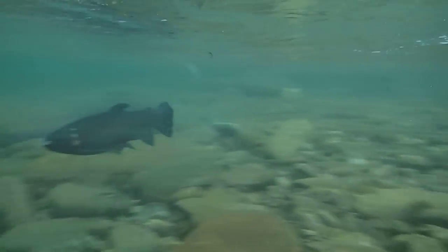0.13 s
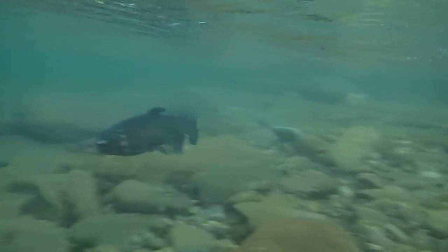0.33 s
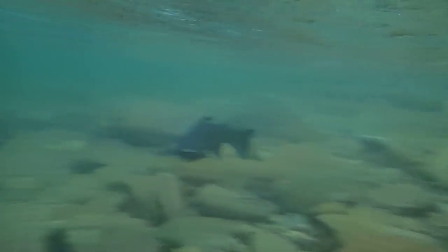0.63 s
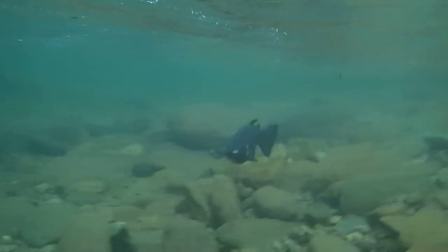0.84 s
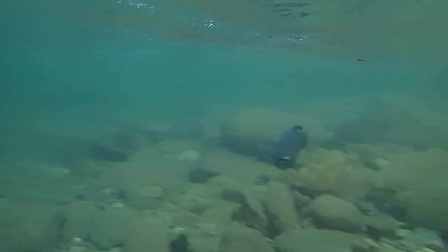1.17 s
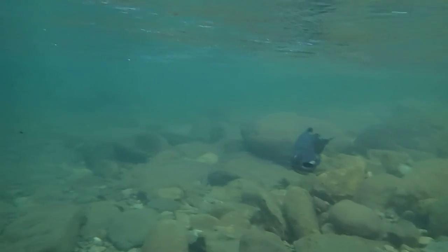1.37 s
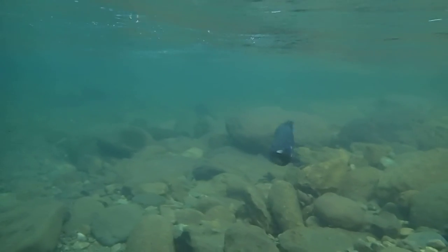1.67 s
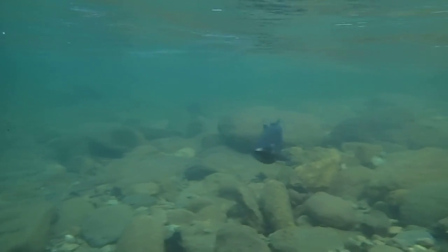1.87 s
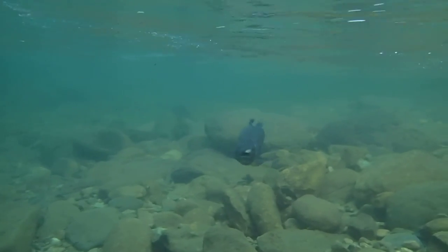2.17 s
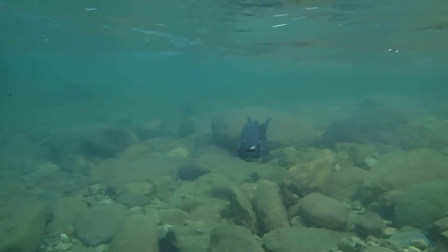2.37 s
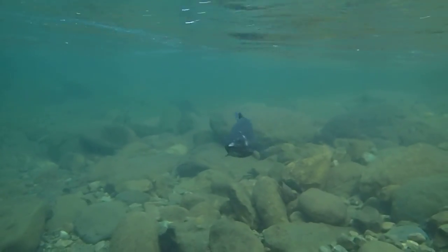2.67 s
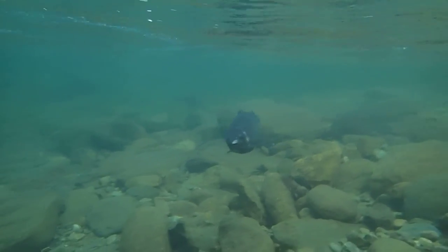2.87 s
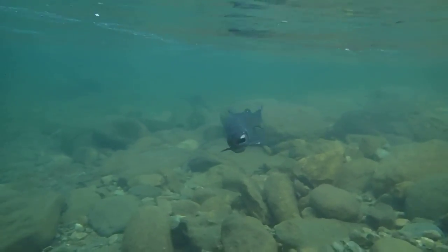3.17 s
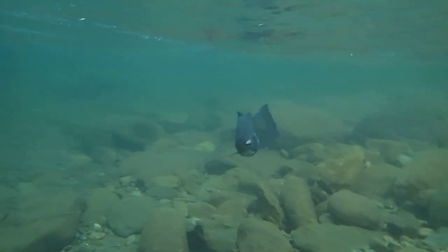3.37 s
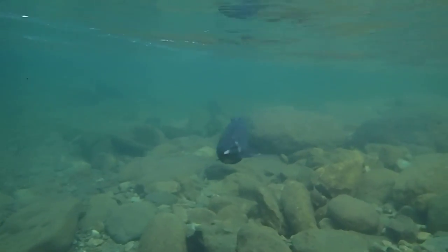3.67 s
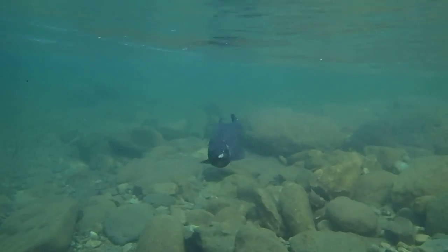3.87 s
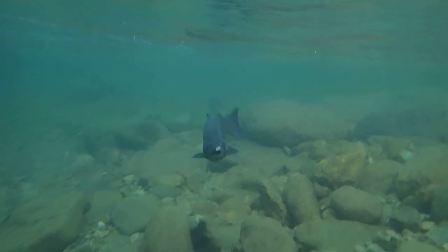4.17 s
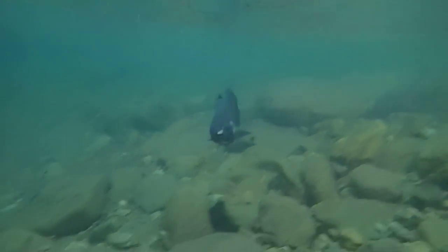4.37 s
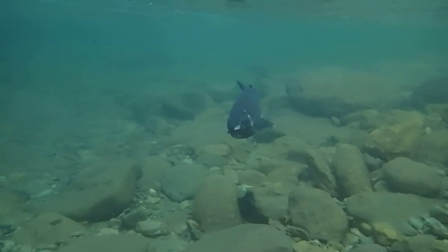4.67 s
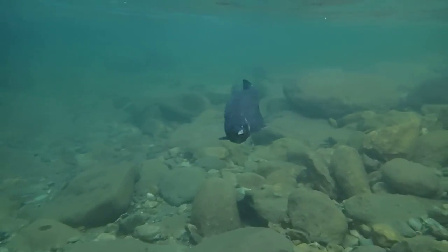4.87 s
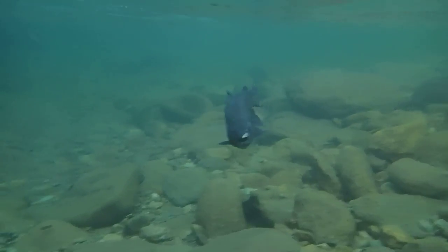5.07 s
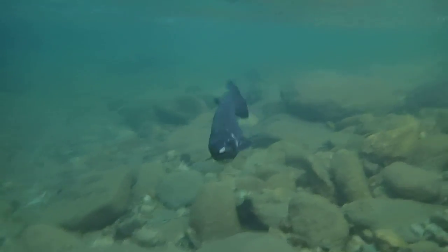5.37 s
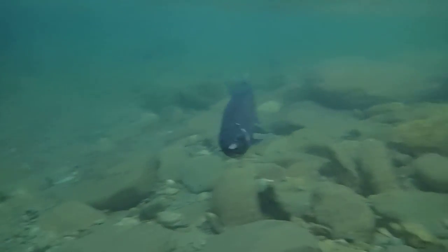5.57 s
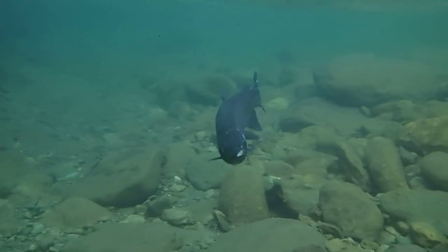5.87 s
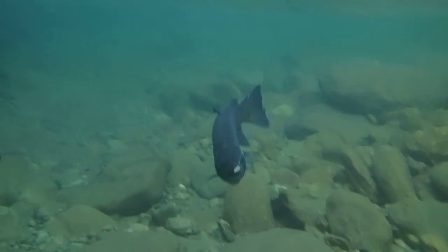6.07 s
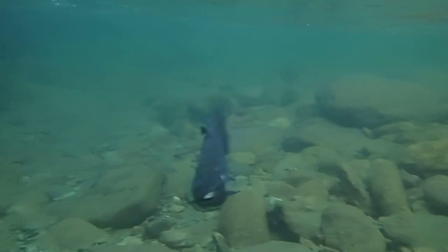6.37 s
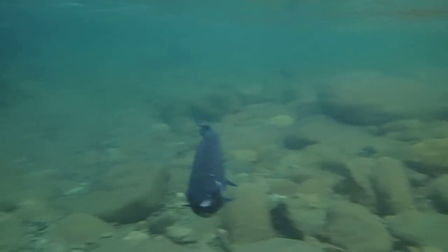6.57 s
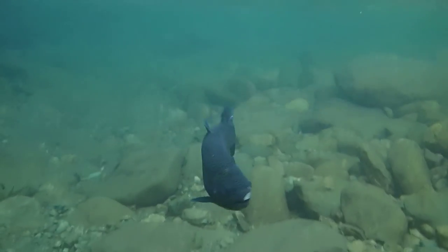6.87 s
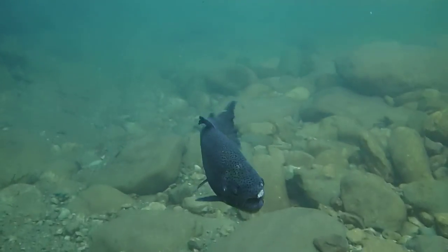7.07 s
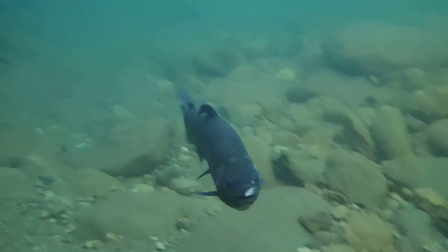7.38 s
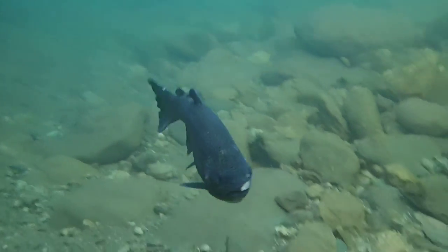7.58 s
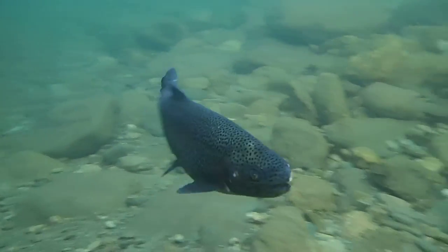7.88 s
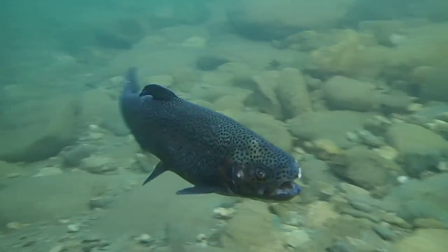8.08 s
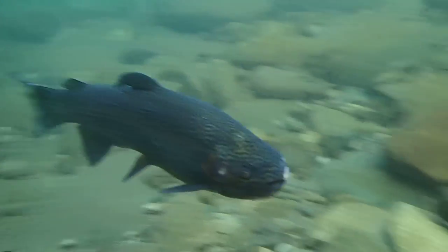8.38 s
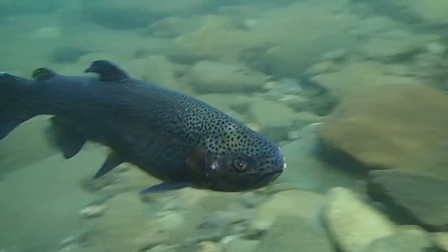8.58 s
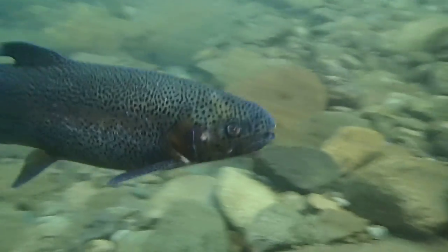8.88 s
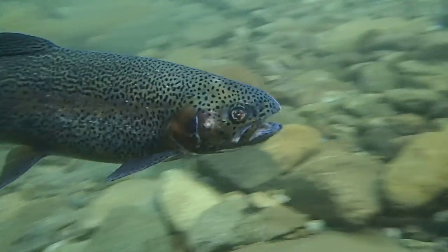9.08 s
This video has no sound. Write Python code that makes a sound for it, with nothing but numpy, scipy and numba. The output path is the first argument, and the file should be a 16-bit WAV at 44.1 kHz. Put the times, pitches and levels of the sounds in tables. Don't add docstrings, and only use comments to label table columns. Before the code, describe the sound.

A small camera under water in a shallow stony river hears a hollow, gurgling rush, ringing in low-mid tones and surging unevenly. A fast, regular focus-motor tick runs throughout. Water slaps the left side in scattered knocks; low gulps touch the right. The right-hand tone climbs until a water film bursts in a loud, distorted crack with a short flapping buzz; the sound ducks briefly, then the rush returns.

```python
import sys
import numpy as np
from scipy import signal
from scipy.io import wavfile
from scipy.ndimage import uniform_filter1d
from numba import njit

SR = 44100
rng = np.random.default_rng(int(sys.argv[2]) if len(sys.argv) > 2 else 0)


def invert_db(x):
    u = np.asarray(x, float) / 20
    return 10 ** u


def generate_wav(sig):
    pcm = np.round(np.clip(np.atleast_2d(sig).T, -1, 1) * 32767).astype(np.int16)
    wavfile.write(sys.argv[1], SR, pcm)


N = 406602

# push_hz, push_db
LEFT_PUSH = [(20, -28), (45, -30), (100, 4.5), (200, -2.5), (330, 3), (600, 6.5), (800, 1), (1100, 4.5),
             (1250, 0), (2200, 5.5), (3500, -11), (6000, -21)]
RIGHT_PUSH = [(20, -31), (45, -37), (70, -17.5), (120, -12.5), (220, -8), (400, -2), (770, -0.5),
              (1100, -1.5), (1600, -5), (2500, -3), (3350, -8), (3650, -23), (6000, -19)]
# push_hz, likeness_0_to_1
PUSH_LIKENESS = [(40, 0.64), (100, 0.9), (170, 0.57), (400, 0.68), (700, 0.83), (1100, 0.87), (2000, 0.24)]
# mode_hz, width_hz, gain_db
CASE_MODES = [(327, 10, -5), (830, 81, 5), (1106, 32, -1)]
# centre_s, half_width_s, left_db, right_db
SURGES = [(0.2, 0.27, 1.5, 3), (0.62, 0.14, 3.5, -1), (1.3, 0.45, 1.5, 0), (3.6, .25, 0.5, 0),
          (5.25, 0.15, 4.5, 0), (5.5, 0.45, 0, 3), (6.1, 0.1, -3.5, 0.5), (6.6, 0.35, 0.5, -1.1),
          (8.0, 0.17, -1.2, -1), (8.335, .035, 5, 2), (8.8, 0.089, -0.5, -2), (9.06, 0.1, 3.5, 0.5)]
# time_s, resonance_hz
LEFT_POCKET = [(0.03, 420), (0.55, 349), (0.9, 380), (1.3, 332), (2.8, 342), (3.4, 316), (3.9, 270),
               (4.15, 325), (4.7, 339), (5.4, 317), (5.85, 376), (6.5, 354), (7.1, 385), (8, 424),
               (8.6, 460), (9.2, 468)]
LEFT_DB = -32.5
LEFT_Q, RIGHT_Q_BEFORE, RIGHT_Q_AFTER = 6.5, 11.0, 7.0
# tear_s, slack_hz, creep_hz_per_s, stretch_hz, stretch_time_s
FILMS = [
    (6.1373, 730, 12.9, 132, 0.48),
    (9.225, 564.4, 2.44, 110, 0.29),
]
# pitch_share, time_s, level_db
SNAPS = [
    (0.45, 0.02, 3),
    (0.95, 0.045, -1),
]
FILM_DB = (-31.6, -28.7)
# centre_s, rise_hz, half_width_s
BULGES = [
    (6.0, 70, 0.05),
    (8.0, 40, 0.14),
    (8.7, 84.5, 0.32),
    (8.95, 152, 0.063),
]
BURST_S = 6.1384
# start_s, peak_db, push_ms
SLAPS = [(0.519, -21, 1.6), (0.538, -19, 1.45), (0.558, -32, 1.4), (0.579, -24, 3.1), (0.765, -16.5, 0.65),
         (0.938, -23, 2.1), (1.525, -33, 1.1), (1.703, -23, 2.7), (2.333, -27, 1.8), (3.845, -24.5, 2.1),
         (4.201, -19.5, 1.7), (4.374, -25.5, 1), (4.523, -25, 1.3), (4.618, -15, 0.72), (4.687, -11, 0.5),
         (5.077, -19, 1.6), (5.237, -9.5, 0.41), (5.666, -10.5, 0.64), (5.861, -20, 0.8), (6.752, -8, 0.45),
         (6.901, -24, 1), (7.081, -17.5, 0.77), (7.312, -21.5, 0.9), (8.143, -25, 0.8), (8.2, -13.5, 0.49),
         (8.308, -23, 0.94), (8.317, -20, 0.6), (8.329, -17, 0.9), (8.343, -25, 0.9), (8.354, -23, 0.9)]
# start_s, peak_db, pitch_hz
GULPS = [
    (0.308, -26, 88.8),
    (5.789, -38, 61.9),
    (5.829, -30, 73),
    (5.857, -41, 121),
    (6.287, -22, 79.4),
    (7.22, -37, 148),
    (8.329, -27, 187),
    (8.732, -32, 105),
    (9.053, -19, 96),
    (9.169, -35, 61.9),
]
# centre_s, level_db, length_s, pitch_hz
SPRAYS = [
    (8.345, -42, .04, 1550),
    (8.955, -41, .08, 1500),
    (9.213, -28, 0.03, 1650),
]
STEP_S, FIRST_STEP_S = 1001 / 30000, 0.02155
STEP_HZ, STEP_SIDES_DB, BACK_STEP_DB = 760, (-28, -25), -2.0
# delay_s, pitch_hz, length_s, level_db, return_step_db
WHINES = [(.027, 5550, .011, -59, -4), (.0235, 2850, .004, -53, 4.5), (.031, 3150, .004, -54, 4.0)]
TICK_S = 7.6975
# mode_hz, level_db, t60_s
TICK_MODES = [(5680, -19.5, 0.0047), (6080, -49, 0.033), (10400, -23, 0.0046), (2700, -29, 0.0024),
              (14000, -31, .003), (8200, -28, 0.0028), (12200, -26, .003)]
# mode_hz, width_hz, level_db
HUMS = [(326.2, 11.7, -38), (807, 17, -58.5), (1004, 20, -60), (1120, 14, -60), (5580, 680, -69)]
HUM_SIDES_DB, WET_HUM_DB = (-1.5, -9.5), 2.5
HUM_FADE_S, HUM_FADE_DB = 7.0, -10.0
# band_hz, level_db
HISS = [(200, 13), (2000, 4), (5000, 3.5), (8000, 2), (12000, 1), (16000, 1.5)]
HISS_SIDES_DB = (-55.5, -52.5)


def read(points, hz):
    f, value = np.transpose(points)
    return np.interp(np.log(hz + 1), np.log(f + 1), value)


def evened(x):
    return x / np.sqrt(np.mean(x ** 2, axis=-1, keepdims=True) + 1e-20)


def add(mix, s, sound):
    part = mix[round(s * SR):][:len(sound)]
    part += sound[:len(part)]


def bump(t, length_s):
    return np.sin(np.pi * np.clip(t / length_s, 0, 1)) ** 2


def swell(t, centre_s, half_s):
    return np.exp(-((t - centre_s) / half_s) ** 2)


def noise(shape_db, same, patchy_db):
    frames, hz = N // 256 + 5, np.fft.rfftfreq(1024, 1 / SR)
    a, b, c, d, patches = rng.standard_normal((frames, 513, 5)).T
    patches = uniform_filter1d(uniform_filter1d(patches, size=6, axis=0), size=8, axis=1)
    same = np.clip(same(hz), 0, 1)[:, None]
    left, other = a + 1j * b, c + 1j * d
    z = np.array([left, same * left + np.sqrt(1 - same ** 2) * other])
    z *= invert_db(shape_db(hz)[:, :, None] + patchy_db(hz)[:, None] * patches / patches.std())
    return evened(signal.istft(z, nperseg=1024, noverlap=768)[1][:, :N])


def current():
    def case_db(hz):
        return sum(db / (1 + (2 * (hz - f) / width) ** 2) for f, width, db in CASE_MODES)

    def shape_db(hz):
        return np.array([read(LEFT_PUSH, hz) + case_db(hz), read(RIGHT_PUSH, hz)])

    def patchy_db(hz):
        return read([(60, 4.7), (200, 1.2), (500, 0.8)], hz)

    flow = noise(shape_db, lambda hz: read(PUSH_LIKENESS, hz), patchy_db)
    bass = signal.lfilter(*signal.butter(1, 140, fs=SR), flow)
    return flow - 0.91 * (np.arange(N) / SR > BURST_S) * bass


@njit
def spring(push, turn, loss):
    out, place, speed = np.zeros(len(push)), 0., 0.
    for i in range(len(push)):
        speed += turn[i] * (turn[i] * (push[i] - place) - loss[i] * speed)
        place += speed
        out[i] = place
    return out


def film(t):
    k = (t >= BURST_S).astype(int)
    tear_s, slack_hz, creep, stretch_hz, stretch_s = np.transpose(FILMS)[:, k]
    share, quick_s, snap_db = np.transpose(SNAPS)[:, k]
    left_s = np.maximum(tear_s - t, 0)
    hz = slack_hz + creep * t + stretch_hz * np.exp(-left_s / stretch_s)
    hz = hz + sum(rise_hz * swell(t, s, half_s) for s, rise_hz, half_s in BULGES)
    snap = np.exp(-left_s / quick_s)
    return hz * (1 + share * snap), np.array(FILM_DB)[k] + snap_db * snap


def burst():
    t, out = np.arange(round(0.09 * SR)) / SR, np.zeros(N)

    def tone(hz):
        return np.sin(2 * np.pi * hz * t)

    crack = 1.44 * np.sign(np.cos(2 * np.pi * 3400 * t)) * (t < 0.00036)
    crack -= 5.5 * (t > 0.00036) * (t < 0.00066)
    empty = 0.8 * np.exp(-t / 0.01) - 0.5 * np.cos(2 * np.pi * 3300 * t) * np.exp(-t / 0.0009)
    add(out, BURST_S, crack + (t > 0.00066) * empty * (t < 0.0034))

    turns = 612 * t + 0.04 * tone(230) * (t > 0.003)
    edge = 1 + 60 * np.exp(-t / 0.0022)
    flap = np.tanh(edge * np.sin(2 * np.pi * turns))
    flap *= np.exp(-(2 * turns % 1) / 0.35) * np.exp(-t / 0.006 - (t / 0.015) ** 4)

    ring = np.sin(2 * np.pi * turns + 0.5) * (np.exp(-(t / 0.0185) ** 8) + 0.2 * np.exp(-t / 0.02))
    onset = np.minimum(t / 0.008, 1)
    ring += 0.3 * tone(385) * onset * np.exp(-t / 0.022)
    ring += 0.08 * tone(255) * onset * np.exp(-t / 0.025)
    ring += 0.02 * tone(6250) * np.exp(-t / 0.006)
    add(out, BURST_S + 0.0034, 44.0 * flap + 9.5 * ring)
    return out


def slaps():
    out = np.zeros(N)
    for s, db, ms in SLAPS:
        add(out, s + 0.0022, -invert_db(db + 4.5) * np.hanning(max(round(ms * SR / 500), 8)))
    return signal.lfilter(*signal.butter(2, 150, "high", fs=SR), out)


def gulps():
    out = np.zeros(N)
    for s, db, hz in GULPS:
        cycles = np.arange(round(2.2 * SR / hz)) * hz / SR
        envelope = (cycles / 1.01) * np.exp(1 - cycles / 0.45)
        add(out, s, invert_db(db + 8.0) * np.sin(2 * np.pi * cycles) * envelope)
    for (s, db, length_s, hz), fizz in zip(SPRAYS, rng.standard_normal((len(SPRAYS), 4000))):
        band = signal.butter(2, [hz * 0.9, hz * 1.08], "band", fs=SR)
        fizz = evened(signal.lfilter(*band, fizz))
        add(out, s - length_s / 2, invert_db(db) * fizz * bump(np.arange(4000) / SR, length_s))
    return out


def motor():
    at = np.arange(FIRST_STEP_S, N / SR, STEP_S)
    luck, t = rng.standard_normal((len(at), 8)), np.arange(500) / SR
    buzz, whine = np.zeros(N), np.zeros(N)
    shape = bump(t, 0.005) * np.cos(2 * np.pi * STEP_HZ * t)
    for k, (s, row) in enumerate(zip(at, luck)):
        back = k % 2
        step_db = BACK_STEP_DB * back + 2.03 * row[1] - 5.8 * (s > 5.3)
        add(buzz, s + 0.00005 * row[0], (-1) ** k * invert_db(step_db) * shape)
        for (late_s, hz, length_s, db, back_db), size, tune in zip(WHINES, row[2:5], row[5:]):
            chirp = bump(t, length_s) * np.sin(2 * np.pi * hz * (1 + 0.015 * tune) * t)
            damp_db = -7.0 * (s > BURST_S and hz < 4000)
            level = invert_db(db + damp_db + 0.83 * size + back_db * back)
            add(whine, s + late_s - length_s / 2, level * chirp)
    rasp = evened(uniform_filter1d(rng.standard_normal(N), size=60))
    return invert_db(np.array(STEP_SIDES_DB))[:, None] * buzz, whine * (1.0 + 0.39 * rasp)


def tick(s, db):
    t, out = np.arange(3000) / SR, np.zeros(N)
    rise = np.minimum(t / 0.00048, 1)
    for hz, mode_db, t60_s in TICK_MODES:
        add(out, s, rise * invert_db(db + mode_db - 60 * t / t60_s) * np.sin(2 * np.pi * hz * t))
    return out


def hums():
    t, out = np.arange(N) / SR, np.zeros((2, N))
    fade_db = HUM_FADE_DB * np.clip(t - HUM_FADE_S, 0, 1)
    low = invert_db(np.array(HUM_SIDES_DB)[:, None] + fade_db)
    top = invert_db(WET_HUM_DB * (t > BURST_S))
    for (hz, width_hz, db), shake in zip(HUMS, rng.standard_normal((len(HUMS), N))):
        hum = invert_db(db) * evened(signal.lfilter(*signal.iirpeak(hz, hz / width_hz, SR), shake))
        out += hum * (top if hz > 4000 else low)
    return out


def hiss():
    sides = noise(lambda hz: read(HISS, hz)[None], lambda hz: 0 * hz, lambda hz: 0.3 + 0 * hz)
    return invert_db(np.array(HISS_SIDES_DB))[:, None] * sides


def scene():
    t, flow, (buzz, whine) = np.arange(N) / SR, current(), motor()
    surge_db = sum(np.array(sides)[:, None] * swell(t, s, half_s) for s, half_s, *sides in SURGES)
    slap, out = slaps(), np.zeros((2, N))
    blows = [slap, 0.14 * slap]
    pockets = [(np.interp(t, *np.transpose(LEFT_POCKET)), LEFT_DB), film(t)]
    q = [np.full(N, LEFT_Q), np.where(t < BURST_S, RIGHT_Q_BEFORE, RIGHT_Q_AFTER)]
    for c, (hz, level_db) in enumerate(pockets):
        turn = 2 * np.sin(np.pi * hz / SR)
        loss = turn.mean() / turn / q[c]
        push = invert_db(level_db + surge_db[c]) * flow[c] + buzz[c] + blows[c]
        out[c] = spring(push, turn, loss)
    out[1] += burst() + gulps()
    out[0] += tick(BURST_S, -25.0)
    out += invert_db([[-5.0], [3.0]]) * tick(TICK_S, 0)
    out += invert_db([[-11.0], [1.6]]) * whine
    return out + hums() + hiss()


@njit
def squeeze(over_db, grab, release):
    out, now = np.zeros(len(over_db)), 0.
    for i in range(len(over_db)):
        now += (over_db[i] - now) * (grab if over_db[i] > now else release)
        out[i] = now
    return out


def low_pass(x):
    return signal.sosfilt(signal.butter(12, 15790, fs=SR, output="sos"), x)


def record(dry):
    b, a = signal.iirnotch(4050, 6.0, SR)
    x = dry - 0.94 * (dry - signal.lfilter(b, a, dry))
    level = uniform_filter1d(abs(x).max(0), size=40)
    over_db = np.maximum(20 * np.log10(level + 1e-9) + 10, 0)
    x = x / invert_db(squeeze(over_db, 1 / (0.00061 * SR), 1 / (0.09 * SR)))
    edge = signal.firwin(255, 15850, window=("kaiser", 8), fs=SR)
    mix = signal.oaconvolve(np.clip(x, -1, 1), edge[None], "same")
    return low_pass(mix)


dry = scene()
out = record(dry)
generate_wav(out)
```